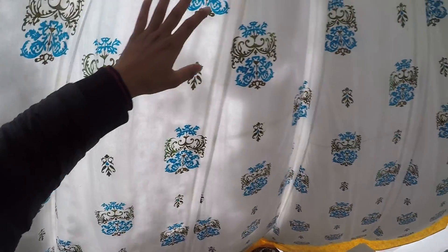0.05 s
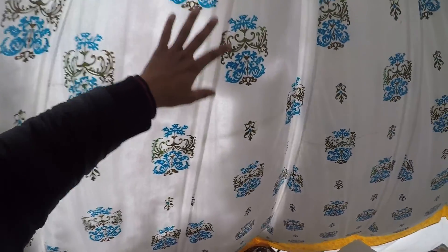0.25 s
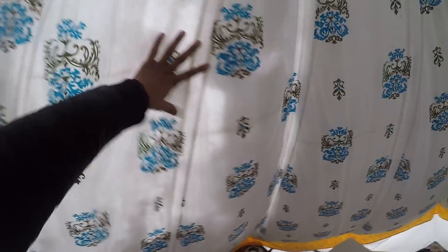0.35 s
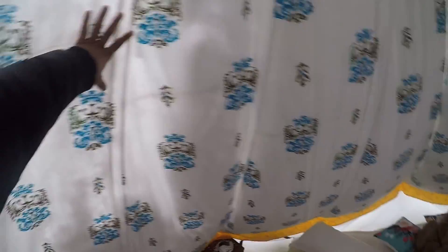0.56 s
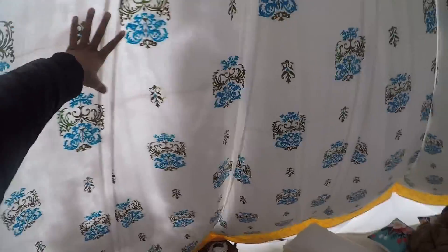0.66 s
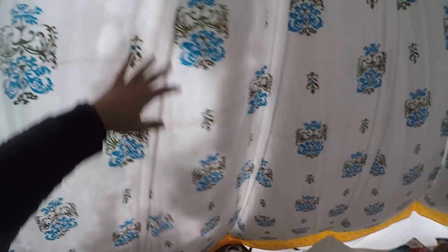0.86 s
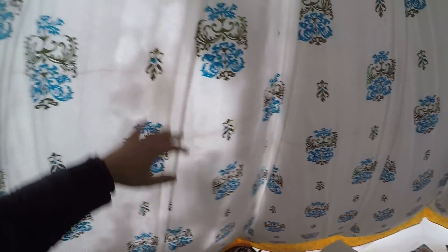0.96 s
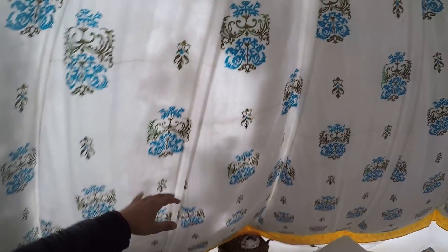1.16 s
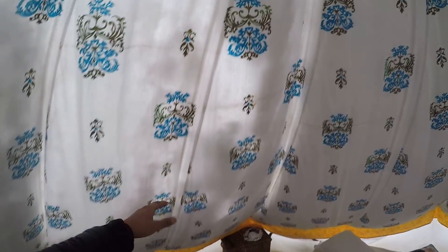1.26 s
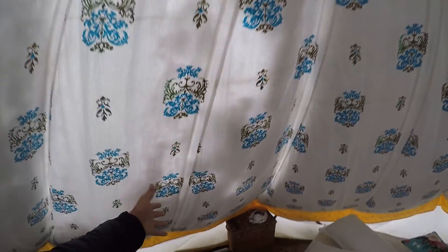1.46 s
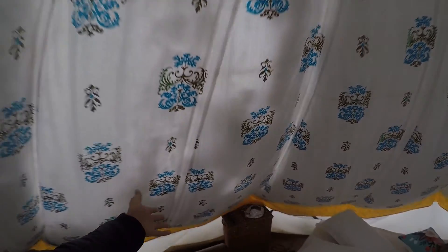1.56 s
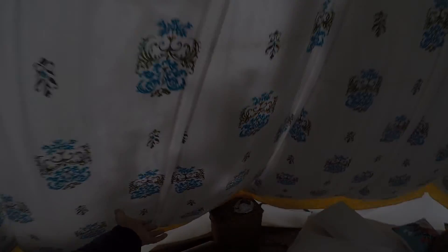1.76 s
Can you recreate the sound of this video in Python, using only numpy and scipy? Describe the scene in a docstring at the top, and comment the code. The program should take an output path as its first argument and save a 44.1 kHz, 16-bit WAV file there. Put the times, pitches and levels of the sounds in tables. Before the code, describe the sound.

Tent fabric thumps and rustles as a hand slaps it and brushes down it.

```python
"""A hand brushes the loose cloth wall of a tent, heard from inside at arm's length.
From the start the weave hisses under the palm, folds rub, and the slack sheet flutters and billows
over a low rumble. The hand pats the cloth (0.2 s), lifts, slaps it taut (0.36 s), slides down in
one swelling stroke that flaps the folds (peak 0.83 s) and pats it once more (1.48 s)."""
import sys
import numpy as np
from scipy import signal
from scipy.fft import rfft, irfft, next_fast_len
from scipy.io import wavfile
from scipy.ndimage import map_coordinates

SR = 44100
rng = np.random.default_rng(int(sys.argv[2]) if len(sys.argv) > 2 else 0)


def inscribe(sig):
    """Save sig as 16-bit PCM at rate SR to the path in sys.argv[1].

    A 1-D sig is mono; a 2-D sig holds one channel per row.
    Samples are clipped to [-1, 1] before scaling.
    """
    pcm = np.round(np.clip(np.atleast_2d(sig).T, -1, 1) * 32767)
    wavfile.write(sys.argv[1], SR, pcm.astype(np.int16))


N = 79380

# stereo width of the rubbing sounds (frequency [Hz], side minus mid [dB])
RUB_WIDTH = [(100, -51), (280, 7), (450, -12), (750, -0.5), (1200, -2), (2000, -0.5), (3200, -6.5),
             (5300, -8.5), (8800, -0.5), (14000, -12)]
# stereo width of the low sounds (frequency [Hz], side minus mid [dB])
BASS_WIDTH = [(30, -22), (70, 0.5), (130, -11), (260, -14), (600, -2.5)]


def amp(db):
    return 10 ** (np.asarray(db) / 20)


def rms(x):
    return np.sqrt(np.mean(x ** 2) + 1e-20)


def since(start_s):
    """Seconds since start_s; 0 before it."""
    return np.maximum(np.arange(N) / SR - start_s, 0)


def along(points, hz):
    """Interpolate (frequency [Hz], value) points on a log axis."""
    knots_hz, values = np.transpose(points)
    return np.interp(np.log(hz + 1), np.log(knots_hz + 1), values)


def curves(rows):
    """One value per sample for each column after the time."""
    times_s, *columns = np.transpose(rows)
    return [np.interp(np.arange(N) / SR, times_s, column) for column in columns]


def wobble(rate_hz):
    """Smooth random curve, rate_hz knots a second."""
    knots = rng.standard_normal(int(N * rate_hz / SR) + 4)
    return map_coordinates(knots, [np.arange(N) * rate_hz / SR])


def filtered(x, response):
    """Apply the gain response(hz)."""
    size = next_fast_len(N + SR // 2)
    return irfft(rfft(x, size) * response(np.fft.rfftfreq(size, 1 / SR)), size)[..., :N]


def slips(rate_hz, scatter_db=0):
    """Two trains of random impulses; rate sets density, not level."""
    chance = rate_hz / SR
    size = amp(scatter_db * rng.standard_normal((2, N)))
    sign = np.sign(rng.standard_normal((2, N)))
    impulses = (rng.random((2, N)) < chance) * size * sign / np.sqrt(chance)
    return impulses / rms(impulses)


def coloured(drive, spectrum, width):
    """Shape two drives as mid (rms 1) and side; return left and right."""
    side_gain = lambda hz: np.array([np.ones_like(hz), amp(along(width, hz))])
    mid, side = filtered(drive, lambda hz: amp(along(spectrum, hz)) * side_gain(hz))
    return np.array([mid + side, mid - side]) / rms(mid)


def sliding():
    """Threads and creases catch and slip under the palm, more densely as it speeds up."""
    # hand stroke (time [s], skin-on-weave hiss [dB], fold rub [dB])
    stroke = [(0, -50.5, -49.5), (.11, -54.5, -53.5), (.18, -58, -54.5), (.25, -64.5, -53),
              (.366, -58.5, -52), (.384, -38.5, -40), (.411, -36.5, -43.5), (.424, -44, -39),
              (.48, -43, -40), (.61, -47, -45), (.70, -47.5, -43.5), (.785, -41.5, -40.5),
              (.83, -34, -39.5), (.91, -39, -39.5), (.98, -47.5, -40.5), (1.015, -48, -39),
              (1.05, -53, -47), (1.12, -54, -51), (1.165, -48, -48), (1.27, -57, -50), (1.325, -53, -53),
              (1.45, -57.5, -54), (1.53, -54.5, -54.5), (1.61, -59.5, -52.5), (1.675, -65, -59.5),
              (1.72, -58.5, -59), (1.8, -73.5, -59.5)]
    # weave hiss, a separate narrow sheen, duller fold rub (frequency [Hz], relative density [dB])
    hiss_spectrum = [(700, -7.5), (1600, -3.5), (2600, -2), (4600, 0.5), (5400, 3), (6400, -9.5),
                     (7200, -1), (8000, -12.5), (10000, -14.5), (11500, -35), (13800, -43), (15200, -65)]
    sheen_spectrum = [(3500, -59), (5000, -47.5), (5600, 3), (6400, 4), (7000, -7.5), (8500, -11),
                      (13000, -25)]
    rub_spectrum = [(150, -13), (400, 1.5), (750, 2), (1300, 1), (2000, -4), (3200, -10.5), (6000, -16.5),
                    (12000, -52)]
    threads_per_s, creases_per_s = 9000, 2200
    hiss_db, rub_db = curves(stroke)
    effort_db = hiss_db - hiss_db.mean()
    speed = amp(0.42 * effort_db)
    sheen_db = -53.5 + 0.91 * effort_db  # falls less than the hiss as the hand slows
    grip_db = 0.6 * wobble(rate_hz=60.14)
    hiss = coloured(slips(threads_per_s * speed, scatter_db=0.1), hiss_spectrum, RUB_WIDTH)
    sheen = coloured(rng.standard_normal((2, N)), sheen_spectrum, RUB_WIDTH)
    rub = coloured(slips(creases_per_s * speed), rub_spectrum, RUB_WIDTH)
    rub_db += 1.9 * wobble(rate_hz=45.43)
    return amp(grip_db) * (amp(hiss_db) * hiss + amp(sheen_db) * sheen + amp(rub_db) * rub)


def swaying():
    """The slack sheet flutters, pushes air in slow billows and flaps as the hand passes folds."""
    # sheet motion (time [s], flutter [dB], billow [dB])
    sway = [(0, -45.5, -37), (.14, -44, -39), (.22, -41.5, -33.5), (.29, -46.5, -49), (.345, -46.5, -44),
            (.39, -27.5, -22), (.45, -35.5, -23), (.51, -33, -28.5), (.62, -37, -32), (.72, -36, -39.5),
            (.85, -38, -28.5), (1.01, -35.5, -27.5), (1.09, -46, -27), (1.17, -42, -34), (1.27, -44, -30.5),
            (1.42, -46, -34), (1.54, -43, -37), (1.67, -53, -34.5), (1.8, -57, -45)]
    # flutter and billows (frequency [Hz], relative density [dB])
    flutter_spectrum = [(50, -3), (110, -9), (190, 1), (250, -3.5), (330, -6.5), (430, -11), (550, -21.5),
                        (800, -52), (2000, -74), (6000, -90)]
    billow_spectrum = [(10, -14.5), (25, -2.5), (45, -1.5), (70, -5.5), (90, -11.5), (125, -11.5),
                       (200, -55), (500, -34), (2000, -100)]
    # hand passes a fold (time [s], thump [dB])
    folds = [(.49, -24), (0.834, -22), (0.864, -27), (.905, -22), (0.982, -21.5), (1.067, -25),
             (1.143, -31), (1.259, -29), (1.347, -33.5)]
    flutter_db, billow_db = curves(sway)
    flutter_drive = slips(rate_hz=110) + 0.6 * rng.standard_normal((2, N))
    flutter = coloured(flutter_drive, flutter_spectrum, BASS_WIDTH)
    billow = coloured(rng.standard_normal((2, N)), billow_spectrum, BASS_WIDTH)
    flaps = sum(thump(start_s, level_db) for start_s, level_db in folds)
    return flaps + amp(flutter_db) * flutter + amp(billow_db) * billow


def rumble():
    """Steady, faint low noise."""
    # background (frequency [Hz], relative density [dB])
    spectrum = [(20, -26), (80, -32), (250, -10), (700, -25), (2500, -42), (7000, -30), (11000, -35),
                (15000, -44)]
    return amp(-60) * coloured(rng.standard_normal((2, N)), spectrum, BASS_WIDTH)


def pats():
    """Each contact thumps the sheet and scuffs the weave."""
    # hand meets cloth (time [s], thump [dB], scuff [dB], scuff rise [s], scuff t60 [s])
    contacts = [(0.197, -33, -37.5, 0.0028, 0.097), (0.203, -25.5, -40, 0.0025, 0.068),
                (.356, -10, -28, 0.0033, 0.047), (.375, -12, -31, 0.003, 0.094),
                (0.396, -11, -28.5, 0.0021, 0.035), (0.571, -33, -42.5, .005, 0.037),
                (.997, -42, -38, 0.0055, 0.051), (1.480, -27.5, -35.5, 0.0039, 0.11)]
    # scuff (frequency [Hz], relative density [dB])
    spectrum = [(100, -10), (300, -5.5), (550, 11.5), (850, 3), (1350, 2), (2100, -7.5), (4000, -6.5),
                (6000, -3), (8000, -13.5), (10500, -23), (14500, -42)]
    thumps, scuffs = np.zeros(N), np.zeros((2, N))
    for start_s, thump_db, scuff_db, rise_s, t60_s in contacts:
        t = since(start_s)
        thumps += thump(start_s, thump_db)
        envelope = (1 - np.exp(-(t / rise_s) ** 2)) * amp(-60 * t / t60_s)
        scuff = coloured(slips(rate_hz=9000, scatter_db=0.5), spectrum, RUB_WIDTH)
        scuffs += amp(scuff_db) * envelope / envelope.max() * scuff
    return thumps, scuffs


def thump(start_s, level_db):
    """A soft push rings the sheet's low modes, a little differently each time."""
    # heavily damped sheet modes (frequency [Hz], level [dB], t60 [s])
    modes = [(40.7, -8.5, 0.2), (85.5, -1, 0.1), (154.4, -0.5, 0.072), (194.5, -2, 0.073), (255, -6, 0.057),
             (302.5, -10, 0.066), (407.4, -10.5, 0.073)]
    rise_s = 0.0023
    t = since(start_s)
    ring = np.zeros(N)
    for k, (hz, mode_db, t60_s) in enumerate(modes):
        mode_db += 1.6 * rng.standard_normal()
        hz *= 1 + 0.045 * rng.standard_normal()
        ring += (-1) ** k * amp(mode_db - 60 * t / t60_s) * np.sin(2 * np.pi * hz * t)
    return amp(level_db) * ring * (1 - np.exp(-t / rise_s))


def snap():
    """A bright crack as the slap takes up the slack."""
    # cloth snapping taut (frequency [Hz], relative density [dB])
    spectrum = [(300, -5), (1200, 13), (2600, 9), (5000, -5), (8300, 4), (11000, -14), (15000, -26)]
    level_db, rise_s, t60_s = -30.5, 0.0019, 0.027
    t = since(start_s=0.36)
    envelope = (1 - np.exp(-t / rise_s)) * amp(-60 * t / t60_s)
    crack = coloured(rng.standard_normal((2, N)), spectrum, RUB_WIDTH)
    return amp(level_db) * envelope / envelope.max() * crack


def at_hand(x):
    """Pan with the hand; add a fixed colour and phase difference between the ears."""
    # hand position (time [s], left minus right [dB])
    pan = [(0, -1.5), (.2, -2.5), (.4, -0.5), (.5, -2), (.7, 2), (.85, 0), (.96, -3), (1.18, 1), (1.35, 0),
           (1.49, -1), (1.7, 2)]
    # ear-to-ear colour (frequency [Hz], left minus right [dB])
    tilt = [(300, 0.5), (730, 1.5), (1200, 1.5), (2000, 3.5), (3200, 0.5), (5300, 4.5), (8000, 2.5),
            (14000, -3)]
    # ear-to-ear phase (frequency [Hz], left lead [rad])
    lead = [(400, -0.63), (1200, -0.13), (1700, 1.87), (2700, -0.52), (6200, 1.4), (11000, -1.9)]
    pan_db, = curves(pan)
    sides = np.array([[0.5], [-0.5]])
    ears = lambda hz: amp(sides * along(tilt, hz)) * np.exp(1j * sides * along(lead, hz))
    return filtered(amp(sides * pan_db) * x, ears)


def tent(x):
    """The cloth walls add a short, weak reverberation."""
    wet_db, t60_s = -10, 0.046
    t = np.arange(SR // 4) / SR
    tail = rng.standard_normal((2, len(t))) * amp(-60 * t / t60_s)
    tail /= np.linalg.norm(tail[0])
    return x + amp(wet_db) * signal.fftconvolve(x, tail, axes=1)[:, :N]


def scene():
    """The rubbing follows the hand from side to side; the bass is not panned."""
    thumps, scuffs = pats()
    rubbing = at_hand(scuffs + snap() + sliding())
    return rumble() + tent(thumps + rubbing) + swaying()


def record(dry):
    """The highest treble fades, then cuts off."""
    # treble roll-off (frequency [Hz], gain [dB])
    rolloff = [(10000, 0), (11500, -2), (14000, -2), (15000, -14)]
    cutoff_hz = 15150
    return filtered(dry, lambda hz: amp(along(rolloff, hz)) * (hz < cutoff_hz))


dry = scene()
out = record(dry)
inscribe(out)
```